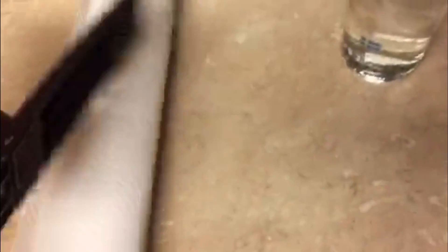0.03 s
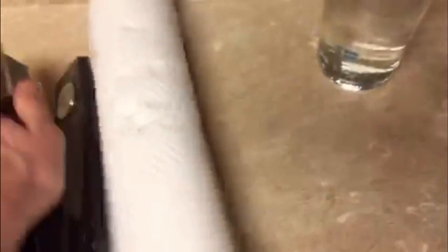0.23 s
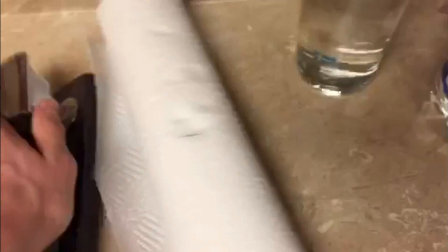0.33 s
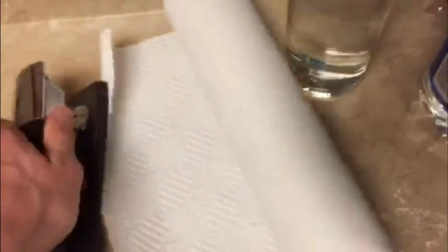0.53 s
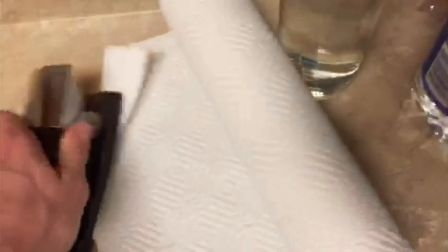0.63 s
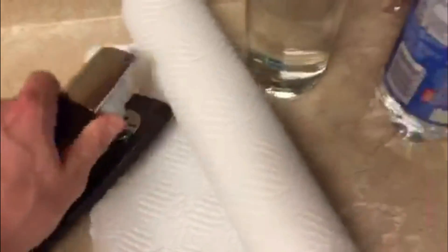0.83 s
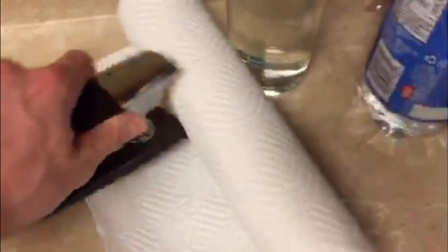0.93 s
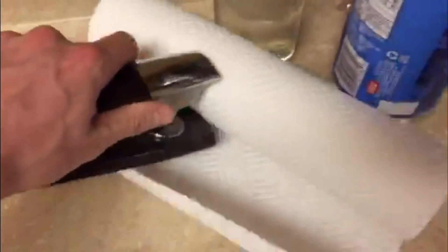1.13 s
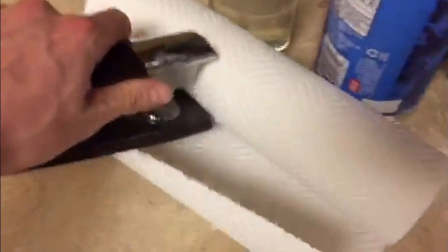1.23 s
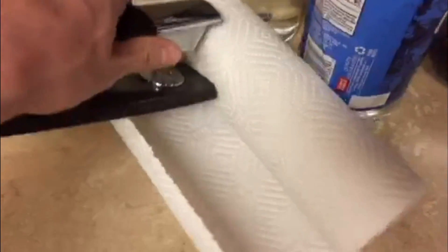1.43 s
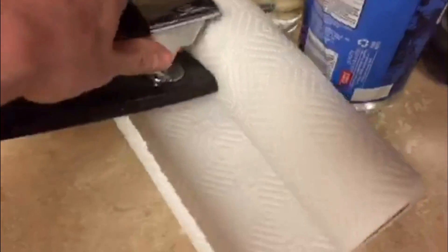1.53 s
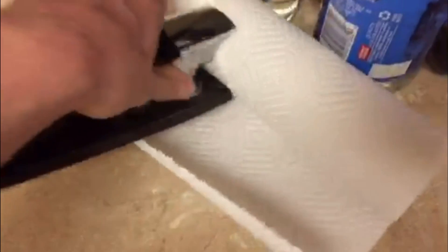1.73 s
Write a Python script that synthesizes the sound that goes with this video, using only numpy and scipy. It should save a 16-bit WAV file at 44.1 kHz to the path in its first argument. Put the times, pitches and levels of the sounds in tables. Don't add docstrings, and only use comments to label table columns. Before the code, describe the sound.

Stapler handling up close: sharp metal clicks, one hard knock on the counter, a rumbling drag, small snaps

```python
import sys
import numpy as np
from scipy import signal
from scipy.fft import rfft, irfft
from scipy.io import wavfile
from scipy.ndimage import uniform_filter1d

SR = 44100
rng = np.random.default_rng(int(sys.argv[2]) if len(sys.argv) > 2 else 0)


def volts_from_decibels(level):
    exponent = np.asarray(level, float) / 20
    return 10 ** exponent


def output_pcm(signal):
    pcm = np.clip(np.atleast_2d(signal).T, -1, 1) * 32767
    wavfile.write(sys.argv[1], SR, np.round(pcm).astype(np.int16))


N = 79380

MODE_SPREAD_DB, DETUNE = 1.5, 0.006


def evened(x):
    return x / np.sqrt(np.mean(x ** 2) + 1e-20)


def read(points, hz):
    f, value = np.transpose(points)
    return np.interp(np.log(hz + 1), np.log(f + 1), value)


def curve(points):
    s, db = np.transpose(points)
    return volts_from_decibels(np.interp(np.arange(N) / SR, s, db))


def colour(x, points):
    spectrum_db = np.maximum(read(points, np.fft.rfftfreq(4096, 1 / SR)), -100)
    cepstrum = irfft(np.log(volts_from_decibels(spectrum_db)))
    cepstrum[1:2048] *= 2
    cepstrum[2049:] = 0
    taps = irfft(np.exp(rfft(cepstrum)))
    return signal.oaconvolve(x, taps / np.linalg.norm(taps))[:len(x)]


def ring(x, modes, spread_db=0, detune=0):
    t = np.arange(SR // 4) / SR
    off = rng.standard_normal((len(modes), 2)) * (spread_db, detune)
    body = np.zeros(len(t))
    for k, (hz, db, t60) in enumerate(modes):
        decay = volts_from_decibels(db + off[k, 0] - 60 * t / t60)
        body += (-1) ** k * decay * np.sin(2 * np.pi * hz * (1 + off[k, 1]) * t)
    return signal.oaconvolve(x, body / np.linalg.norm(body))[:len(x)]


def grains(per_s, spread_db, count=N):
    size = volts_from_decibels(spread_db * np.minimum(rng.exponential(1, count), 5)) * rng.choice([-1., 1.], count)
    return evened(size * (rng.random(count) < per_s / SR))


def add(mix, s, sound):
    part = mix[round(s * SR):][:len(sound)]
    part += sound[:len(part)]


def contact(per_s, length):
    t = np.arange(SR // 4) / SR
    force = grains(per_s, 2.54, count=len(t)) + 1.77 * (t == 0)
    return force, np.exp(-t / length), t


def steel(rows, modes, tint):
    ticks, rings = np.zeros((2, N))
    for s, tick_db, ring_db, length in rows:
        force, shape, t = contact(12000, length)
        add(ticks, s, volts_from_decibels(tick_db) * force * shape)
        add(rings, s, volts_from_decibels(ring_db + 4.5) * ring(force * shape, modes, MODE_SPREAD_DB, DETUNE))
    low_cut = signal.butter(4, 1020, "high", fs=SR, output="sos")
    return signal.sosfilt(low_cut, colour(ticks, tint) + rings)


def air():
    # f/Hz, level/dB per Hz
    hum = [(15, -76.5), (25, -25.5), (91, -23), (122, -10), (160, -26.5), (210, -29), (320, -44.5),
           (1410, -46), (15500, -59)]
    # f/Hz, level/dB, t60/s
    hz, db, t60 = (590, -61.5, 0.2)
    t = np.arange(N) / SR
    noise = evened(colour(rng.standard_normal(N + 4096), hum)[4096:])
    return volts_from_decibels(-59) * noise + volts_from_decibels(db - 60 * t / t60) * np.sin(2 * np.pi * hz * t)


def paper():
    # t/s, level/dB
    rustle = [(.2, -59), (.22, -40), (.3, -42), (.43, -58.5), (.47, -45.5), (.56, -51), (.65, -64.5),
              (.71, -45.5), (.82, -44), (.87, -63), (.97, -53.5), (1.1, -51), (1.23, -49), (1.28, -60),
              (1.574, -55.5), (1.583, -39.5), (1.68, -42), (1.695, -51.5)]
    # f/Hz, level/dB per Hz
    fibre = [(180, -61), (300, -21.5), (1000, -8), (1700, -4.5), (2700, -10), (6000, -17), (15500, -21.5)]
    clumps = volts_from_decibels(evened(uniform_filter1d(rng.standard_normal(N), 500)))
    still = [(0.17, -120)]
    return colour(grains(3700, -3) * clumps * curve(still + rustle), fibre)


def arm():
    # t/s, tick level/dB, ring level/dB, decay time/s
    clicks = [(.206, -34, -54, 0.0025), (0.2103, -13, -16, 0.0038), (0.2275, -29, -29.5, 0.0034),
              (.266, -8.5, -58, 0.0071), (0.269, -8, -31, 0.0024), (0.448, -23, -65, 0.0084),
              (0.459, -25.5, -30, 0.0016), (.508, -33.5, -66, 0.0036), (.5172, -33, -60, 0.0036),
              (0.539, -29, -60, 0.0039), (0.7075, -36.5, -49, 0.0012), (.744, -35.5, -39.5, 0.0049),
              (0.799, -37, -53, 0.0044), (0.813, -43, -46, 0.0027), (0.869, -50.5, -69, 0.0074),
              (.7148, -45, -43, 0.013), (.7333, -41, -27.5, 0.0026), (.954, -49, -49.5, 0.0083),
              (1.02, -70, -48.5, 0.011), (1.7005, -36, -77, 0.0037), (1.7425, -36, -25, 0.00049),
              (1.7435, -28.5, -49, 0.003)]
    # f/Hz, level/dB, t60/s
    arm_modes = [(950, -8, .012), (1600, -5, .02), (1740, 0, .05), (2090, -5, .015), (2260, -5, .025),
                 (2560, -5, .025), (3150, -8, .015)]
    # f/Hz, level/dB per Hz
    tick = [(400, -62.5), (800, -2), (2300, -4), (3800, -7.5), (9200, -9), (12500, -12), (15500, -16)]
    return steel(clicks, arm_modes, tick)


def base():
    # t/s, slab level/dB, shell level/dB, contact time/s
    knocks = [(.266, -9.5, -8.5, 0.0058), (.279, -36, -18.5, 0.0015), (0.287, -16, -32, 0.0011),
              (0.3, -39, -24.5, 0.0039), (0.319, -55, -40, 0.0045), (.355, -65, -36.5, 0.01),
              (0.402, -42, -49, 0.034), (0.454, -34, -36, 0.004), (0.502, -45, -43.5, 0.0081),
              (.513, -42.5, -36, 0.011), (0.54, -36.5, -46, 0.025), (.558, -60, -59, 0.0044),
              (.582, -39.5, -47, 0.0077), (0.621, -47, -53, 0.008), (.698, -52, -42, 0.0075),
              (0.74, -38, -37.5, 0.0057), (0.779, -69, -65, 0.0051), (0.834, -48, -78.5, 0.0054),
              (0.899, -52, -75, 0.006), (1.14, -35.5, -70, 0.0037), (1.7403, -39, -60, 0.003),
              (1.776, -49, -78, 0.0051)]
    # f/Hz, level/dB, t60/s
    slab = [(105.8, -17, 0.34), (116.1, -2.5, 0.15), (170, -8, 0.075), (228.7, -4.5, 0.05), (315, -10, 0.1),
            (353, -1, 0.08), (383, -8.5, 0.075), (463, -10, 0.036)]
    # f/Hz, level/dB, t60/s
    shell = [(557, 1, 0.062), (570, -3.5, 0.072), (674, 2, 0.093), (807, -1, 0.054), (992.4, 2, 0.057),
             (1040, 4, 0.03), (1168, -4.5, 0.12), (1247, -1, 0.052), (1380, -6, 0.057), (1495, -0.5, .04),
             (1822, -8.5, 0.065), (2085, -3.5, 0.0386), (2300, -13.5, 0.085), (2693, 0, .02)]
    # f/Hz, level/dB per Hz
    clack_tint = [(150, -9), (400, -3.5), (1000, 7.5), (2200, -2.5), (3500, -12), (5000, -19.5),
                  (16000, -28)]
    push_s, push_gain = 0.00051, 0.91
    slab_chatter, shell_chatter, blow_db = 0.1, 0.42, 16.5
    rattle_s, rattle_db = 0.051, -16.5
    thump_hz, thump_db = 38.5, -8.5
    out, push, clack = np.zeros((3, N))
    for s, slab_db, shell_db, length in knocks:
        force, shape, t = contact(4000, length)
        soft = min(length / 0.0082, 1) ** 2
        shape = shape * (1 - soft * np.exp(-t / length))
        slab_force = slab_chatter * force * shape + push_gain * np.exp(-t / push_s)
        add(out, s, volts_from_decibels(slab_db + 3.5) * ring(slab_force, slab, MODE_SPREAD_DB, DETUNE))
        blow = (1 - soft) * volts_from_decibels(blow_db) * (t == 0) + (shell_chatter + soft) * force * shape
        dull = 0.743 * soft
        force, blow = signal.lfilter([np.sqrt(1 - dull ** 2)], [1, -dull], [force, blow])
        add(out, s, volts_from_decibels(shell_db + 8) * ring(blow, shell, MODE_SPREAD_DB, DETUNE))
        rattle = volts_from_decibels(rattle_db) * (1 - soft) * np.exp(-t / rattle_s)
        add(clack, s, volts_from_decibels(shell_db + 7.5) * force * (shape + rattle))
        add(push, s, volts_from_decibels(slab_db + thump_db) * shape)
    thump_band = signal.butter(2, [thump_hz / 2, thump_hz * 2], "band", fs=SR, output="sos")
    return out + colour(clack, clack_tint) + signal.sosfilt(thump_band, push)


def heel():
    # t/s, slab level/dB, heel level/dB, contact time/s
    thuds = [
        (.7150, -38, -28.5, 0.00011),
        (.7165, -17.5, -44, 0.0015),
        (.7333, -33.5, -23, 0.00046),
        (0.7343, -24, -39, 0.00061),
        (.7445, -35, -29, 0.00048),
    ]
    # f/Hz, level/dB, t60/s
    pressed = [(118.3, -3.5, 0.089), (182, -5.5, 0.043), (241, -7.5, 0.051), (373.2, 0.5, 0.074),
               (524.4, -6.5, 0.11), (660, -3, 0.027)]
    # f/Hz, level/dB, t60/s
    heel_modes = [(926, 2, 0.012), (1280, -8, 0.016), (1642, -5, 0.041), (2020, 0.5, 0.017),
                  (2560, -2, 0.0075), (3370, -8, 0.012)]
    out, t = np.zeros(N), np.arange(SR // 4) / SR
    for s, slab_db, heel_db, length in thuds:
        blow = np.exp(-t / length) / (length * SR)
        add(out, s, volts_from_decibels(slab_db + 32.5) * ring(-blow, pressed))
        add(out, s, volts_from_decibels(heel_db + 23.5) * ring(1. * (t == 0), heel_modes, MODE_SPREAD_DB, DETUNE))
    return out


def drag():
    # t/s, rumble level/dB, grit relative to rumble/dB
    strokes = [
        (1.12, -57, -35),
        (1.15, -29, -19.5),
        (1.19, -28, -19.5),
        (1.36, -28.5, -16),
        (1.47, -27, -12),
        (1.58, -30.5, -12.5),
        (1.66, -36, -14.5),
        (1.69, -47.5, -29),
        (1.8, -60, -29),
    ]
    # f/Hz, level/dB, t60/s
    sliding = [(95, -6, .08), (125, -2, .09), (172, -3, .1), (202, -6, .1), (228, 0, .12), (252, -9, .08)]
    # f/Hz, level/dB, t60/s
    sliding_high = [(290, -7, .08), (337, 0, .1), (365, -1, .1), (392, -1, .1), (480, -9, .05), (560, -5, .1),
                    (657, -9, .08), (700, -10, .08)]
    # f/Hz, level/dB, t60/s
    buzz = [(876, -11, .06), (910, -7.5, 0.055), (1023.6, -4, 0.12), (1150, -8, .05), (1298, -3.5, 0.053),
            (1460, -3.5, 0.025), (1630, -3.5, 0.026), (1930, -12, 0.047), (2190, -11.5, 0.036)]
    # f/Hz, level/dB per Hz
    scrape = [(29, -66), (60, -41), (103, -21.5), (227, 0.5), (377, -9.5), (425, -14), (900, -22.5),
              (1170, -27), (1980, -65)]
    # f/Hz, level/dB per Hz
    grit_tint = [(410, -37.5), (700, -6.5), (742, -16.5), (3400, -27), (5140, -43.5), (6180, -43),
                 (7000, -55), (9100, -50), (15400, -120)]
    # f/Hz, t60/s, level re rumble/dB, gain at the jolt/dB
    sing = [(6400, .02, -37, 2), (9750, .02, -46, 5), (10900, .012, -54, 26), (12500, .015, -54, 24)]
    lumps = evened(uniform_filter1d(rng.standard_normal(N), 900))
    flicker = evened(uniform_filter1d(rng.standard_normal(N), 2500))
    rest = [(1.08, -120)]
    level = curve(rest + [(s, rumble_db) for s, rumble_db, _ in strokes])
    grit = curve(rest + [(s, rumble_db + grit_db) for s, rumble_db, grit_db in strokes])
    high_level = level * (grit / level) ** 0.38
    slips = evened(grains(3000, 0.5) * volts_from_decibels(2.54 * lumps))
    hiss = rng.standard_normal(N)

    out = ring(slips * level, sliding)
    out += volts_from_decibels(1.5) * ring(slips * high_level, sliding_high)
    out += volts_from_decibels(4) * ring(slips * grit, buzz)
    out += volts_from_decibels(-2) * colour(hiss * level, scrape)
    out += volts_from_decibels(1) * colour(grains(5500, 1.2) * grit, grit_tint)

    since = np.arange(N) / SR - 1.4365
    jolt = (since > 0) * np.exp(-abs(since) / 0.04)
    moving = level * volts_from_decibels(4 * flicker)
    for hz, t60, db, up_db in sing:
        out += ring(volts_from_decibels(db + up_db * jolt) * moving * hiss, [(hz, 0, t60)])
    return out


def spring():
    # t/s, tick level/dB, ring level/dB, decay time/s
    snaps = [(1.4365, -43, -80, 0.02), (1.469, -46, -67, 0.0012), (1.581, -41, -56, 0.0033),
             (1.5892, -26, -33, 0.0016), (1.6071, -33, -35, 0.0033), (1.619, -36, -60, .002),
             (1.624, -30, -57, 0.0063), (1.634, -32, -41, 0.0013), (1.641, -30, -55, 0.0063),
             (1.648, -32, -53, .004), (1.657, -47, -55, 0.0025), (1.665, -38, -57, 0.0041),
             (1.6725, -21.5, -48, 0.0004), (1.6735, -28, -44, 0.0024), (1.682, -36, -60, .002)]
    # f/Hz, level/dB, t60/s
    spring_modes = [(4300, -8, .004), (5400, 0, .006), (6100, -2, .006)]
    # f/Hz, level/dB per Hz
    snap_tint = [(1470, -50), (2500, 0.5), (3720, -0.5), (5700, 1), (12600, -6), (15500, -4)]
    return steel(snaps, spring_modes, snap_tint)


def room(x):
    # f/Hz, t60/s
    decay_times = [(150, 0.45), (1000, 0.41), (3000, 0.31), (8000, 0.21), (15000, 0.16)]
    shifts_per_s = 14
    taps = rng.standard_normal((3, SR // 2)) * (np.arange(SR // 2) > 200)
    hz, t, z = signal.stft(taps, SR, nperseg=256)
    decay = volts_from_decibels(-60 * t / read(decay_times, hz)[:, None])
    tails = signal.istft(z * decay, SR, nperseg=256)[1]
    wet = signal.oaconvolve(x[None], tails / np.linalg.norm(tails[0]), axes=1)[:, :N]
    phase = shifts_per_s * np.arange(N) / SR + np.arange(3)[:, None] / 3
    turn = np.sqrt(2 / 3) * np.cos(np.pi * phase)
    return (turn * wet).sum(0)


def scene():
    near = paper() + arm() + base() + heel() + drag() + spring()
    return (near + volts_from_decibels(-16) * room(near) + air())[None]


def roll_off(x):
    return signal.sosfilt(signal.butter(12, 16450, fs=SR, output="sos"), x)


def record(dry):
    ceiling, knee = 0.82, 4
    dry = signal.sosfilt(signal.butter(2, 55, "high", fs=SR, output="sos"), dry)
    x = dry / (1 + abs(dry / ceiling) ** knee) ** (1 / knee)
    band_limit = signal.firwin(255, 15400, window=("kaiser", 6), fs=SR)
    x = signal.oaconvolve(x, band_limit[None], "same")
    return roll_off(x)


dry = scene()
out = record(dry)
output_pcm(out)
```